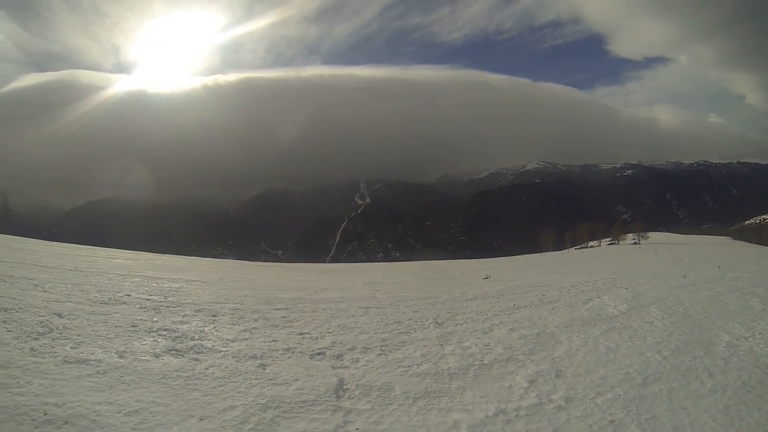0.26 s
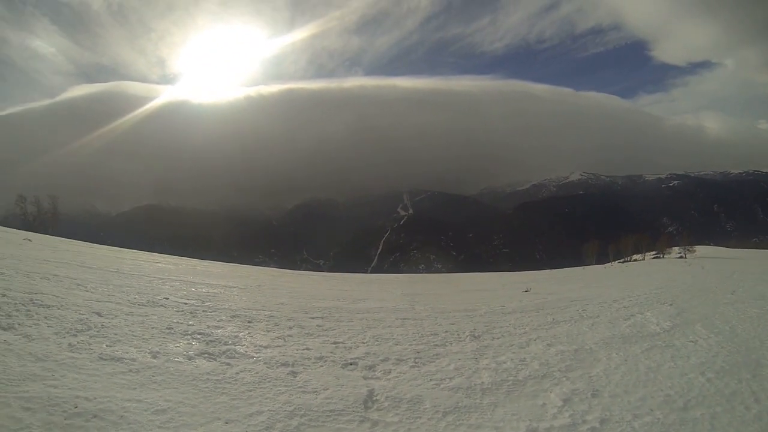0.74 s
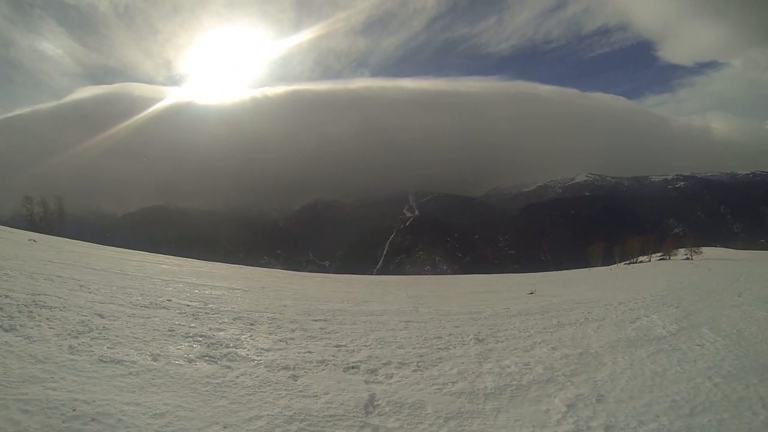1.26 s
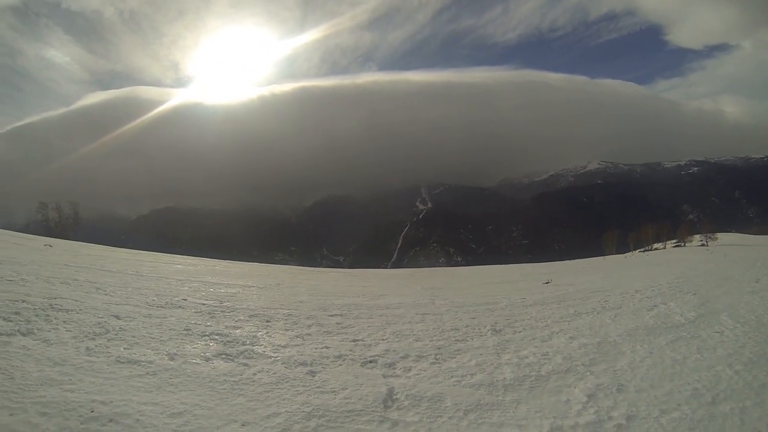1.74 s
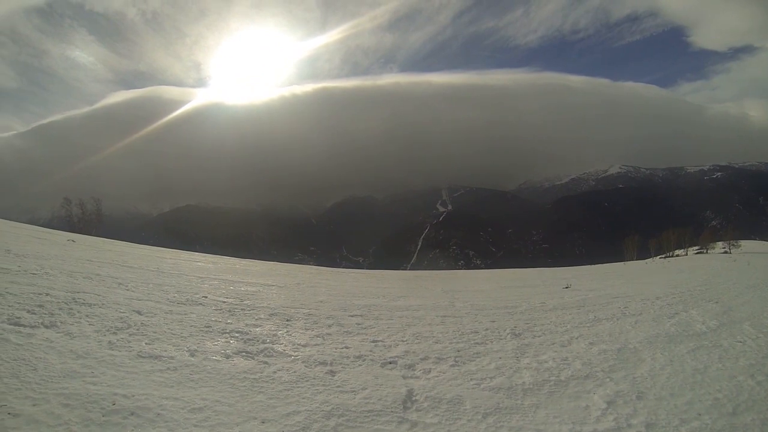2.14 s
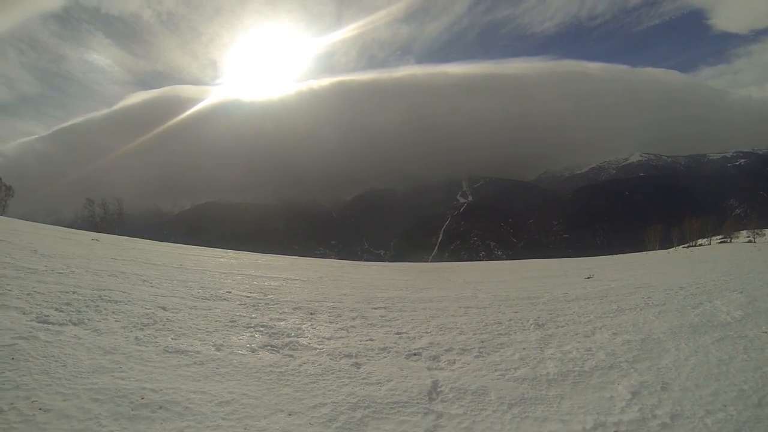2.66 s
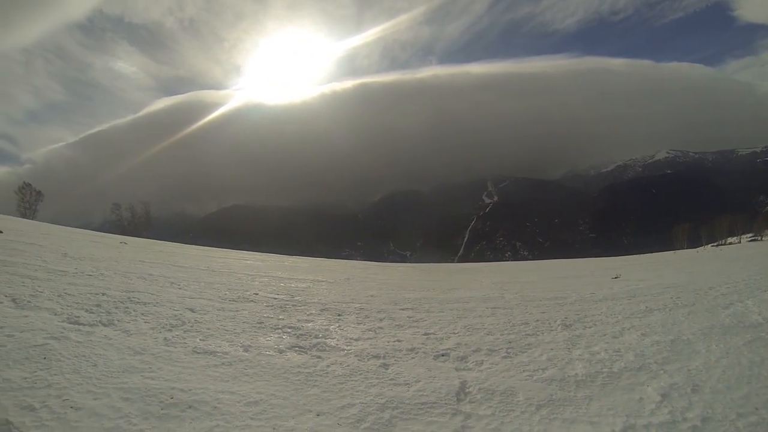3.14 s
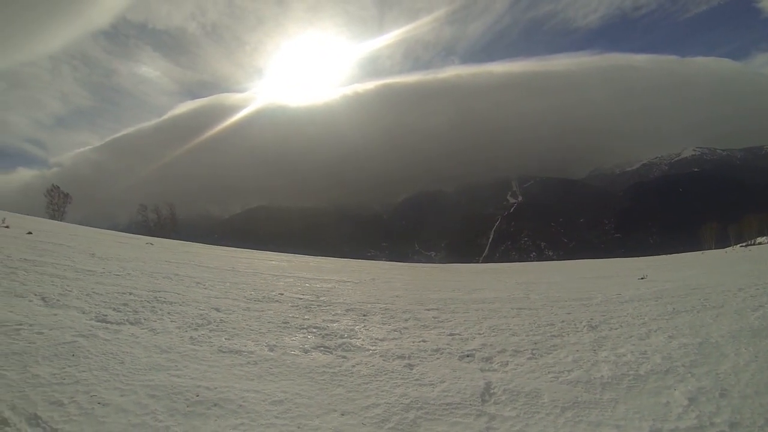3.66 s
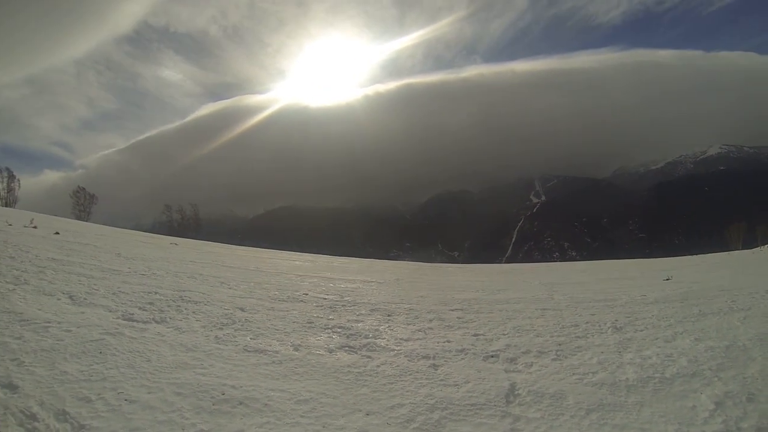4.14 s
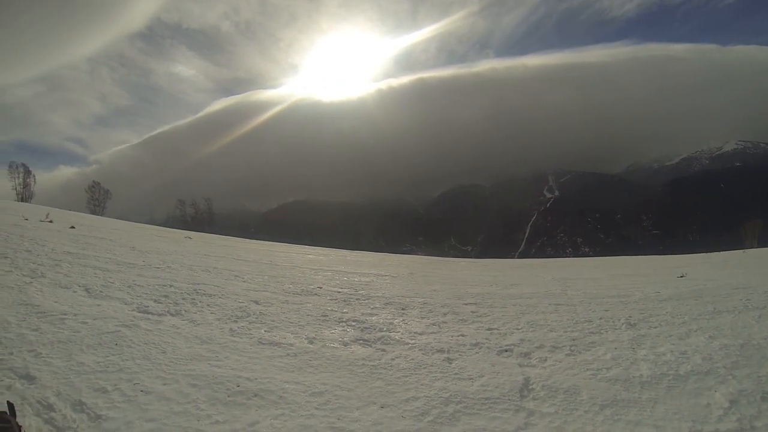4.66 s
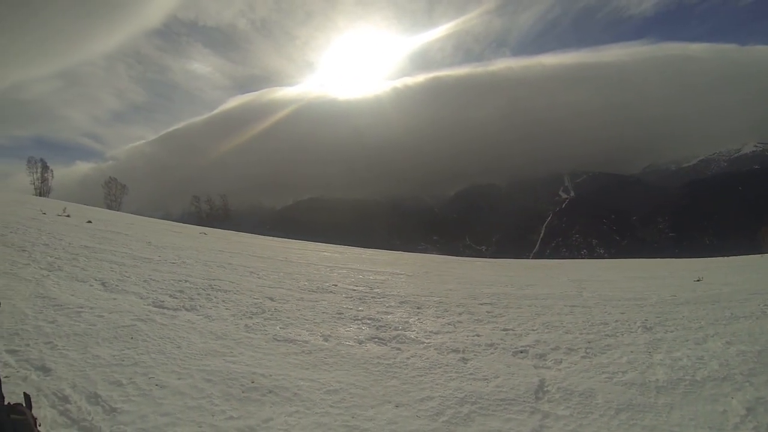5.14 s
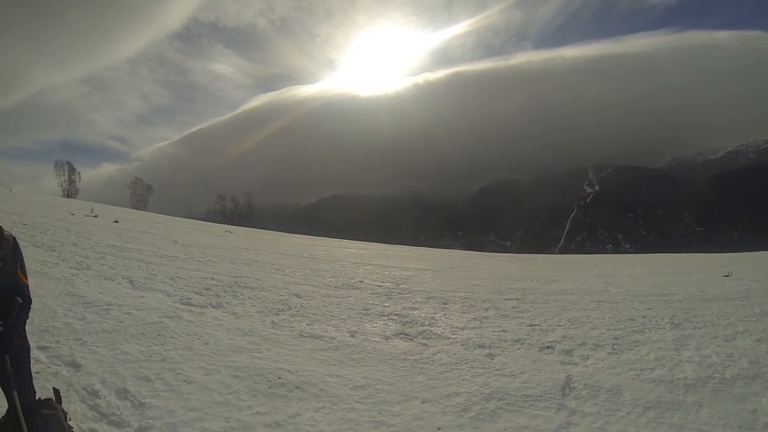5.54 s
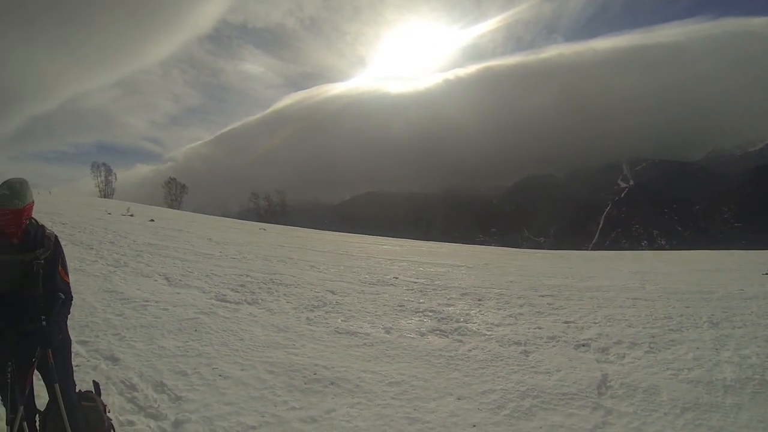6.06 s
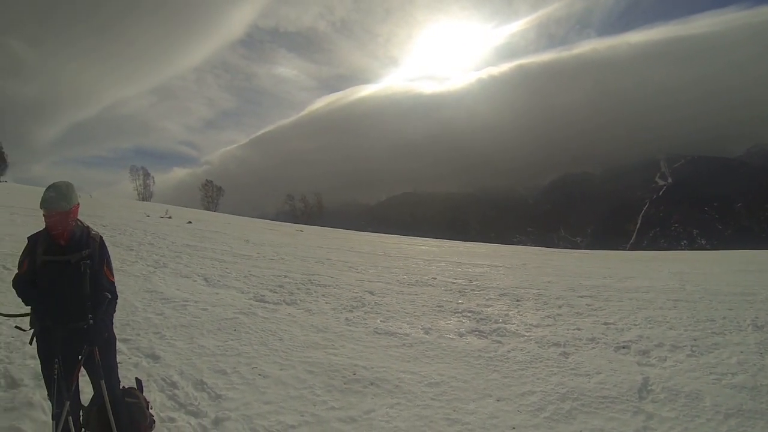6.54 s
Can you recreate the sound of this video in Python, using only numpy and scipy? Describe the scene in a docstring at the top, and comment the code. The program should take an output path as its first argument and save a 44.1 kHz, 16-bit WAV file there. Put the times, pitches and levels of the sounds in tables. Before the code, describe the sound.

Strong wind blows straight onto a small camera's microphone on an open snow slope for nearly seven seconds, already loud at the start. Deep, uneven heaves and thumps dominate, very close and pressed hard at their peaks, with quicker flutter above. A mid-low roar and quieter hiss rush over the housing. Heavy pushes come in the first 0.3 s; around 0.45-0.6 s there are faint squeaky scrapes, dry ticks and one dull knock on the case. From 0.65 to 1.2 s gusts crowd together, with a brief rasp near 1.14 s. Sharp gusts return around 1.5 and 2 s, with a momentary drop at 1.87 s. After about 3.3 s the wind freshens, its roar stronger and slightly higher. Rasping edges touch 4.1 and 5.7 s; sparse ticks continue, one clearer at 5.4 s, amid barely audible snow crackle. Gusts keep surging to the end.

```python
"""Strong wind buffets and roars right at the microphone of a small camera on an open snow slope.
Big eddies heave and thump on the port, smaller ones flutter; air roars, hisses and fizzes over the housing.
Short gusts swell the rushing air, and in brief lulls the flow lets go; a few gust cores rasp.
Grains of blown snow crackle; dry ticks, faint scrapes and one dull knock sound on the case.
Each layer of air is noise shaped in colour and level, and a limiter holds the peaks."""
import sys
import numpy as np
from scipy import signal
from scipy.fft import rfft, irfft
from scipy.io import wavfile
from scipy.ndimage import uniform_filter1d, minimum_filter1d

SR = 44100
rng = np.random.default_rng(int(sys.argv[2]) if len(sys.argv) > 2 else 0)


def inscribe(sig):
    """Save sig as 16-bit PCM at rate SR to the path in sys.argv[1].

    A 1-D sig is mono; a 2-D sig holds one channel per row.
    Samples are clipped to [-1, 1] before scaling.
    """
    pcm = np.round(np.clip(np.atleast_2d(sig).T, -1, 1) * 32767)
    wavfile.write(sys.argv[1], SR, pcm.astype(np.int16))


N = 299880  # samples


def gain_of(db):
    """Decibels to amplitude."""
    return 10 ** (np.asarray(db) / 20)


def seconds():
    """Time of every sample."""
    return np.arange(N) / SR


def evened(x):
    """Scales to rms 1."""
    return x / np.sqrt(np.mean(x ** 2) + 1e-20)


def levels(rows):
    """One gain curve for each dB column of a table, straight in dB between its rows."""
    time_s, *columns_db = np.transpose(rows)
    return [gain_of(np.interp(seconds(), time_s, column_db)) for column_db in columns_db]


def coloured(x, points):
    """Weights the spectrum of x by a colour table, silent beyond its ends, at rms 1."""
    point_hz, point_db = np.transpose(points)
    hz = np.fft.rfftfreq(N, 1 / SR)
    weight_db = np.interp(np.log(hz + 1), np.log(point_hz), point_db, -np.inf, -np.inf)
    return evened(irfft(rfft(x) * gain_of(weight_db), N))


def smoothed(x, hz):
    """Keeps the slow changes: a Gaussian low-pass that reaches 1/e at hz."""
    return irfft(rfft(x) * np.exp(-(np.fft.rfftfreq(N, 1 / SR) / hz) ** 2), N)


def wander(hz):
    """Random drift of rms 1, up to a rate."""
    return evened(smoothed(rng.standard_normal(N), hz))


def turbulence(points, bursts_db, steady_hz):
    """Coloured pressure noise in short bursts; strength changes slower than steady_hz are evened out."""
    noise = coloured(rng.standard_normal(N) * gain_of(bursts_db), points)
    slow_power = np.maximum(smoothed(noise ** 2, steady_hz), 0)
    return noise / np.sqrt(slow_power + 0.012)


def swell(middle_s, length_s):
    """A half-cosine rise and fall of height 1."""
    return np.cos(np.pi * np.clip((seconds() - middle_s) / length_s, -.5, .5))


def swells(rows):
    """One gain curve that swells at each row of a table: middle_s, length_s, level_db."""
    return sum(gain_of(level_db) * swell(middle_s, length_s) for middle_s, length_s, level_db in rows)


# gusts that sweep over the housing; start and end lie halfway up their edges:
# start_s [s], length_s [s], added_roar_db [dB], added_hiss_db [dB]
GUST_TIMES = [(-.03, 0.21, 3.5, 2), (0.648, 0.064, 6, -1.5), (0.731, 0.098, 11, 3), (0.816, 0.073, -1, 2.5),
              (0.894, 0.094, 4, -0.5), (1.075, 0.11, 3, -0.5), (1.117, 0.049, 1, 5.5), (1.246, .16, 2, 3.5),
              (1.474, 0.069, 7, 6.5), (1.7, 0.055, 4, 4.5), (1.758, 0.1, 2.5, 4), (1.94, .055, 4, 5),
              (2.014, 0.1, 3, 3.5), (2.119, 0.087, 5, 5), (2.388, 0.094, 3, 1), (2.553, 0.094, 0.5, 1.5),
              (2.728, 0.14, 3.5, 2), (2.903, 0.11, 2.5, 2), (3.114, 0.12, 4.5, 4.5), (3.434, 0.011, 8.5, 1),
              (3.485, 0.09, 1, 0.5), (3.715, 0.12, 3.5, 3), (3.851, 0.037, 4.5, 3), (4.044, 0.19, 5.5, 2.5),
              (4.233, 0.12, 3, 1.5), (4.422, 0.19, 3, 2), (4.813, 0.038, -1.5, 1.5), (4.947, 0.11, 2.5, 2),
              (5.185, 0.061, 3, 2.5), (5.468, 0.12, 1, 2), (5.659, 0.036, 3.5, 1), (5.937, 0.076, 5, 3),
              (6.073, .11, 4.5, 2.5), (6.224, 0.067, 4.5, 4), (6.346, 0.04, 4.5, 5), (6.532, 0.2, 2.5, 1.5)]
GUST_RISE_S, GUST_FALL_S = 0.063, 0.028
# a short gust has steeper edges: they take at most this share of its length
GUST_EDGE_SHARE = 1
# ragged gust fronts reach the roar and the hiss a little early or late: rms shift and its rate
RAGGED_S, RAGGED_HZ = 0.0038, 25


def gusts():
    """Added roar and hiss in dB: each gust swells and ebbs, with ragged edges of its own in each layer."""
    ragged_t = seconds() + RAGGED_S * np.array([wander(RAGGED_HZ), wander(RAGGED_HZ)])
    added_db = np.zeros((2, N))
    for start_s, length_s, roar_db, hiss_db in GUST_TIMES:
        rise_s, fall_s = np.minimum([GUST_RISE_S, GUST_FALL_S], GUST_EDGE_SHARE * length_s)
        rising = (ragged_t - start_s) / rise_s
        falling = (start_s + length_s - ragged_t) / fall_s
        ramp = np.clip(np.minimum(rising, falling) + .5, 0, 1)
        rounded_ramp = ramp ** 2 * (1 + 2 * (1 - ramp))
        added_db += np.array([[roar_db], [hiss_db]]) * rounded_ramp
    return added_db


# big eddies that hit the port; heave and thump levels before the layer trims, flutter levels as they sound: #
# middle_s [s], length_s [s], heave_db [dB], thump_db [dB], flutter_db [dB]
EDDY_HITS = [(0.138, 0.092, -10.5, -14, -30), (0.22, .07, -10.5, -10, -16.5),
             (0.281, 0.029, -7.5, -9.5, -24), (0.497, 0.039, -1.5, -27, -28.5),
             (0.562, 0.066, -12, -18, -30), (0.738, 0.051, -19, -11.5, -18.5),
             (0.787, 0.091, -7.5, -22, -26), (0.853, 0.081, -20.5, -18, -16.5),
             (0.958, 0.052, -13, -27, -29), (1.096, 0.051, -25, -12, -19.5),
             (1.147, 0.079, -8.5, -15.5, -16.5), (1.405, 0.029, -18.5, -13, -16),
             (1.533, 0.053, -14, -22.5, -21.5), (1.699, 0.029, -15.5, -16, -18),
             (1.796, 0.17, -18.5, -15.5, -26.5), (1.868, 0.035, -11.5, -12, -17),
             (1.984, 0.03, -12, -27.5, -24.5), (2.21, 0.21, -16.5, -18.5, -23.5),
             (2.547, 0.067, -29.5, -13, -24.5), (2.653, .04, -14.5, -26.5, -29),
             (2.759, 0.12, -17.5, -15, -31), (2.952, 0.11, -28.5, -22, -20.5),
             (3.051, 0.023, -15.5, -23.5, -16), (3.161, 0.036, -14.5, -9.5, -15),
             (3.223, .055, -22.5, -8, -17.5), (3.425, 0.08, -11, -18.5, -29.5), (3.53, .08, -9.5, -18, -20),
             (3.617, 0.04, -9, -24, -36), (3.735, 0.027, -23.5, -13.5, -18),
             (3.873, .035, -15.5, -10.5, -24), (4.054, 0.13, -22.5, -13, -25.5),
             (4.197, 0.033, -17.5, -12.5, -18.5), (4.336, 0.063, -20, -11, -20),
             (4.428, 0.072, -18.5, -20, -24), (4.675, 0.071, -15.5, -26, -25),
             (4.802, 0.19, -12.5, -23.5, -21), (4.931, 0.16, -13.5, -16.5, -25),
             (5.224, 0.038, -18.5, -17.5, -21.5), (5.315, 0.12, -15, -15.5, -21.5),
             (5.488, 0.031, -11.5, -17.5, -26), (5.733, 0.13, -11.5, -20.5, -28.5),
             (5.967, 0.06, -12, -11.5, -20), (6.042, 0.041, -13, -23, -33.5), (6.263, 0.16, -9, -16, -27.5),
             (6.597, 0.054, -8.5, -24, -26), (6.783, 0.16, -27, -15.5, -28.5)]
# slow level of the rumble at the port, before trims: time_s [s], heave_db [dB], thump_db [dB], flutter_db [dB]
RUMBLE_LEVELS = [(0, -20.5, -15.5, -20.5), (.5, -19.5, -21.5, -27.5), (1, -14.5, -18.5, -24.5),
                 (1.5, -17, -12.5, -22), (2.3, -17.5, -19.5, -22), (2.95, -17.5, -18, -22.5),
                 (3.4, -13, -16, -20.5), (4.3, -19.5, -19, -24), (5.1, -17.5, -21, -20.5),
                 (5.7, -16, -24, -25), (6.8, -17.5, -21.5, -24.5)]
# colours of the three largest scales of turbulence: pitch_hz [Hz], level_db [dB per Hz, relative]
HEAVE_COLOUR = [(4, -34), (11, -2), (28, 2.5), (50, -0.5), (64, -4), (100, -34)]
THUMP_COLOUR = [(35, -22.5), (56, -2), (75, 0), (115, -2.5), (150, -9), (190, -17.5), (320, -51.5)]
FLUTTER_COLOUR = [(90, -30.5), (140, -4), (170, -0.5), (230, -3.5), (320, -7), (400, -12), (520, -24),
                  (1000, -61.5)]
FLUTTER_FOLLOW = 0.7  # dB of flutter per dB of a gust's added roar


def buffeting(swirl, gust_roar_db, swirl_db=2.0, heave_db=-0.73, thump_db=-0.64, flutter_db=-1.66,
              lumpy_db=1.27, lumpy_hz=11):
    """Big eddies push the diaphragm slowly over a lumpy rumble; smaller ones they shed thump and flutter."""
    heave, thump, flutter = levels(RUMBLE_LEVELS)
    hit_powers = sum(np.outer(gain_of(hit_db), swell(middle_s, length_s)) ** 2
                     for middle_s, length_s, *hit_db in EDDY_HITS)
    shoves, thuds, flaps = np.sqrt(hit_powers)
    # steady rumble and single hits add as powers
    heave = np.hypot(heave * gain_of(lumpy_db * wander(lumpy_hz)), shoves)
    thump = np.hypot(thump * gain_of(lumpy_db * wander(lumpy_hz)), thuds)
    flutter = np.hypot(flutter * gain_of(flutter_db + FLUTTER_FOLLOW * gust_roar_db), flaps)
    big = heave * gain_of(heave_db) * turbulence(HEAVE_COLOUR, 0, steady_hz=8.6)
    middling = thump * gain_of(thump_db) * turbulence(THUMP_COLOUR, 0, steady_hz=8.4)
    small = flutter * turbulence(FLUTTER_COLOUR, swirl_db * swirl, steady_hz=11)
    return big + middling + small


# colour of the roar before its pitch shift: pitch_hz [Hz], level_db [dB per Hz, relative]
ROAR_COLOUR = [(200, -22.5), (330, -1.5), (430, 0), (600, -2), (800, -5), (1000, -10), (1300, -17),
               (1800, -22.5), (3000, -41.5), (6000, -75.5)]
# the wind freshens midway; the roar's pitch before and after, as a factor
FRESHEN_S, FRESHEN_OVER_S = 3.31, .6
SLOW_SHIFT, FAST_SHIFT = 0.99, 1.055


def roaring(bursts_db):
    """The roar moves up in pitch as the wind freshens: an equal-power fade between two colours."""
    def shifted_roar(shift):
        colour = [(hz * shift, db) for hz, db in ROAR_COLOUR]
        return turbulence(colour, bursts_db, steady_hz=7.4)

    fresh = np.clip((seconds() - FRESHEN_S) / FRESHEN_OVER_S, 0, 1)
    slow, fast = shifted_roar(SLOW_SHIFT), shifted_roar(FAST_SHIFT)
    return np.sqrt(1 - fresh) * slow + np.sqrt(fresh) * fast


# the wind between gusts, slow levels before trims: time_s [s], roar_db [dB], hiss_db [dB], fizz_db [dB]
WIND_LEVELS = [(0, -30.5, -38.5, -70.5), (.24, -31.5, -39, -69), (.33, -34, -41.5, -66),
               (.45, -34.5, -41.5, -68), (1.1, -32, -39.5, -67.5), (1.8, -27.5, -43.5, -67.5),
               (2.35, -31, -44.5, -69), (3.05, -31.5, -42.5, -69.5), (3.55, -26.5, -40.5, -63),
               (4.1, -27.5, -40.5, -61.5), (4.55, -26, -40, -62), (5.3, -24.5, -40, -63),
               (5.9, -26.5, -44.5, -72.5), (6.35, -28.5, -42, -70.5), (6.8, -27, -37, -60)]
# colours of the fine turbulence over the housing: pitch_hz [Hz], level_db [dB per Hz, relative]
HISS_COLOUR = [(800, 5), (1300, -5), (1750, -1), (2050, -3), (2400, -7), (2900, -7.5), (3600, -13),
               (4300, -23), (5000, -22.5), (5800, -35.5), (8000, -36), (14000, -63.5)]
FIZZ_COLOUR = [(2500, -18.5), (4200, 3), (5100, 8), (5900, 0), (6500, 0), (7400, -7.5), (8700, 0),
               (9600, -4), (10700, -4.5), (11800, -14), (13500, -18.5), (15000, -31.5)]
FIZZ_FOLLOW = 1.63  # dB of fizz per dB of a gust's added hiss
# pressure at the port (full scale 1) from which the flow snaps, the span to a full snap, and the added fizz
SNAP_PRESSURE, SNAP_SPAN, SNAP_DB = 0.56, .15, 4


def streaming(swirl, gust_roar_db, gust_hiss_db, push, roar_db=-0.59, hiss_db=0.17, fizz_db=1.0):
    """Air tears over the housing, harder in gusts; each swirl roughens all the fine scales at once."""
    roar, hiss, fizz = levels(WIND_LEVELS)
    # the hardest pushes on the port shed a spurt of fine turbulence, and the very hardest snap
    spurt = np.minimum(evened(push) ** 2, 9) - 1
    snap_db = SNAP_DB * np.clip((abs(push) - SNAP_PRESSURE) / SNAP_SPAN, 0, 1)
    roar_bursts_db = 1.38 * swirl + 0.11 * spurt + .5 * wander(40)
    hiss_bursts_db = 0.82 * swirl + 0.16 * spurt + 0.35 * wander(60)
    fizz_bursts_db = 1.6 * swirl + .3 * spurt + 2.0 * wander(900)
    roar_gain = roar * gain_of(roar_db + gust_roar_db)
    hiss_gain = hiss * gain_of(hiss_db + gust_hiss_db)
    fizz_gain = fizz * gain_of(fizz_db + FIZZ_FOLLOW * gust_hiss_db + snap_db)
    low = roar_gain * roaring(roar_bursts_db)
    mid = hiss_gain * turbulence(HISS_COLOUR, hiss_bursts_db, steady_hz=7.4)
    high = fizz_gain * turbulence(FIZZ_COLOUR, fizz_bursts_db, steady_hz=4.9)
    return low + mid + high


def crackle(gust_hiss_db, per_s=140, crackle_db=-9):
    """Fine grains of blown snow tap the case at random moments, harder as the wind fizzes more."""
    fizz = levels(WIND_LEVELS)[2]
    grains = (rng.random(N) < per_s / SR).astype(float)
    return fizz * gain_of(crackle_db + FIZZ_FOLLOW * gust_hiss_db) * coloured(grains, FIZZ_COLOUR)


# small dry ticks, snaps of the flow at the port or blown ice grains:
# middle_s [s], peak_db [dB], pitch_hz [Hz], width_octaves [octaves]
DRY_TICKS = [(0.3226, -38, 4300, .45), (0.4102, -33, 4000, 0.36), (0.5724, -31, 2500, 0.35),
             (0.5784, -29, 3400, 0.79), (1.4042, -38, 4600, .5), (1.5477, -34, 4200, .55),
             (1.867, -28, 3000, .7), (2.1899, -35, 4600, .55), (2.241, -34, 4200, .6),
             (3.444, -35, 4400, .6), (3.5572, -37, 4600, .55), (3.881, -33, 4000, 0.6),
             (4.34, -35, 4200, .65), (4.518, -37, 5600, .6), (4.773, -35, 4600, .55),
             (4.918, -43, 5200, .45), (5.0865, -41, 5670, .12), (5.2918, -44, 6200, .3),
             (5.401, -27, 5200, 0.62), (6.3072, -37, 5600, 0.38)]


def ticks(echo=.35, echo_s=.0006):
    """Each tick is one short knock in a band of the case, and its echo from the far wall."""
    out, half = np.zeros(N), 2048
    hz = np.fft.rfftfreq(2 * half, 1 / SR)
    case = 1 + echo * np.exp(-2j * np.pi * hz * echo_s)
    for middle_s, peak_db, pitch_hz, width_octaves in DRY_TICKS:
        band = np.exp(-.5 * (np.log2((hz + 1) / pitch_hz) / width_octaves) ** 2)
        tick = np.roll(irfft(case * band), half)
        part = out[round(middle_s * SR) - half:][:2 * half]
        part += gain_of(peak_db) * tick[:len(part)] / abs(tick).max()
    return out


# faint squeaky scrapes, perhaps a glove on the case: middle_s [s], length_s [s], level_db [dB]
SCRAPE_TIMES = [(0.448, 0.018, -41.5), (0.505, 0.055, -36.5), (0.552, 0.018, -38.5)]
# their colour: pitch_hz [Hz], level_db [dB per Hz, relative]
SCRAPE_COLOUR = [(1500, -15), (1750, -3), (1920, 6.5), (2120, -2), (2450, -11), (2950, -7), (3400, -14),
                 (4500, -32)]


def scrapes():
    """Short, grainy rubs that all sing in the same two resonances."""
    return swells(SCRAPE_TIMES) * turbulence(SCRAPE_COLOUR, 3.5 * wander(300), steady_hz=60)


# the flow lets go of the port for an instant; a negative drop is a rise:
# start_s [s], length_s [s], rumble_drop_db [dB], air_drop_db [dB]
LULL_TIMES = [(0.557, 0.014, 4, 6), (0.593, 0.055, -3, 6), (0.982, 0.089, 1, 3), (1.205, 0.053, 5.5, -1.5),
              (1.869, 0.07, 11, 4.5), (2.251, 0.092, 3.5, 2), (2.663, 0.062, 1, 1.5), (2.85, .035, 4, 1),
              (2.99, 0.035, 4, 1), (3.07, 0.031, 5, 2.5), (3.34, 0.053, 1.5, 1.5), (3.613, 0.093, 1.5, 5.5),
              (3.891, 0.053, 2.5, 3), (4.367, 0.05, 4.5, 1.5), (5.079, 0.1, 6, 0), (5.708, 0.063, 1.5, 4),
              (6, 0.027, -0.5, 4), (6.463, 0.1, 0.5, -1.5)]
LULL_ONSET_S = 0.0043


def lulls(hold=0.41):
    """Gains of rumble and rushing air: quick to change, held until a share of the lull, then easing back."""
    drop_db = np.zeros((2, N))
    for start_s, length_s, rumble_drop_db, air_drop_db in LULL_TIMES:
        corners_s = [0, LULL_ONSET_S, hold * length_s, length_s]
        depth = np.interp(seconds() - start_s, corners_s, [0, 1, 1, 0])
        drop_db += np.outer([rumble_drop_db, air_drop_db], depth)
    return gain_of(-drop_db)


# what the case rings with when knocked: pitch_hz [Hz], level_db [dB], t60_s [s]
KNOCK_RINGS = [(1090, -15.5, .013), (1330, -19, .008), (1700, -22, .006), (2050, -24, .008)]
KNOCK_S, KNOCK_RISE_S = .6078, .001


def knock():
    """A soft bump rings the case for a few milliseconds in decaying sines."""
    t = np.maximum(seconds() - KNOCK_S, 0)
    ring = sum(gain_of(level_db - 60 * t / t60_s) * np.sin(2 * np.pi * pitch_hz * t)
               for pitch_hz, level_db, t60_s in KNOCK_RINGS)
    return np.minimum(t / KNOCK_RISE_S, 1) * ring


# cores of the sharpest gusts tear at the port with a rasp: middle_s [s], length_s [s], level_db [dB]
RASP_TIMES = [(1.14, .05, -29.5), (1.978, .03, -32), (4.085, .06, -30), (5.68, .025, -32)]
# their colour: pitch_hz [Hz], level_db [dB per Hz, relative]
RASP_COLOUR = [(800, -4), (1200, 5.5), (1900, -3), (2400, -10), (3400, -25)]


def rasps(swirl, rough_db=5.0):
    """Brief, rough bursts of torn air, chopped by the swirl."""
    return swells(RASP_TIMES) * turbulence(RASP_COLOUR, rough_db * swirl, steady_hz=25)


def scene():
    """One swirling, gusting flow drives the wind; ticks, scrapes and a knock sound on the case."""
    swirl = evened(wander(30) + 0.93 * wander(120))
    gust_roar_db, gust_hiss_db = gusts()
    rumble_gain, air_gain = lulls()
    push = buffeting(swirl, gust_roar_db)
    air = streaming(swirl, gust_roar_db, gust_hiss_db, push) + crackle(gust_hiss_db) + rasps(swirl)
    wind = rumble_gain * push + air_gain * air
    return (wind + ticks() + scrapes() + knock())[None]


CEILING_DB, RECOVERY_DB_PER_S = -1.4, 350
EDGE_HZ = 14000  # upper band limit


def record(dry):
    """A look-ahead limiter ducks everything on the hardest peaks; then a low-pass limits the band."""
    over_db = np.maximum(20 * np.log10(abs(dry[0]) + 1e-9) - CEILING_DB, 0)
    # each peak holds the level down, recovering at a steady rate
    recovery_db = seconds() * RECOVERY_DB_PER_S
    held_db = np.maximum.accumulate(over_db + recovery_db) - recovery_db
    # widen each dip to start ahead of its peak, then round its edges
    duck_db = uniform_filter1d(minimum_filter1d(-held_db, size=161), size=161)
    low_pass = signal.firwin(255, EDGE_HZ, window=("kaiser", 9), fs=SR)
    return signal.oaconvolve(dry * gain_of(duck_db), low_pass[None], "same")


dry = scene()
out = record(dry)
inscribe(out)
```